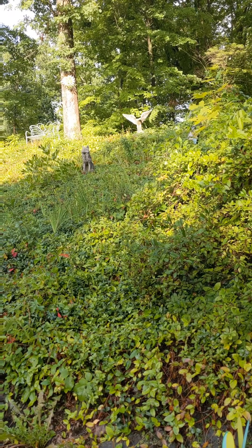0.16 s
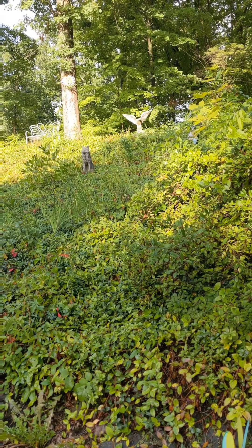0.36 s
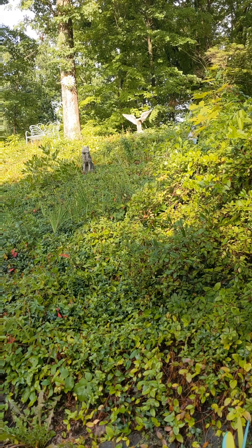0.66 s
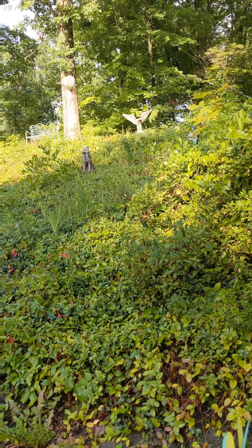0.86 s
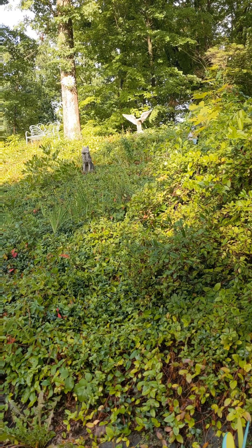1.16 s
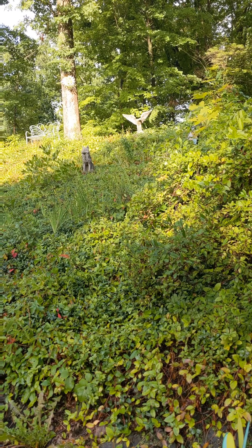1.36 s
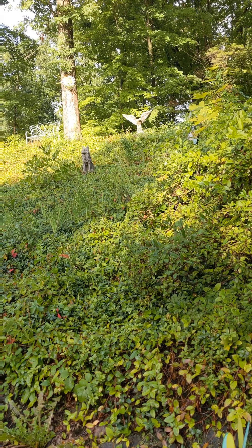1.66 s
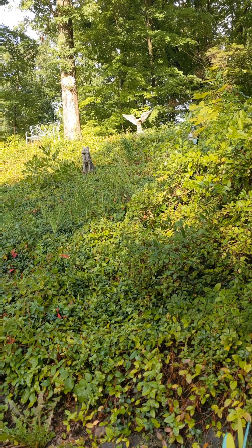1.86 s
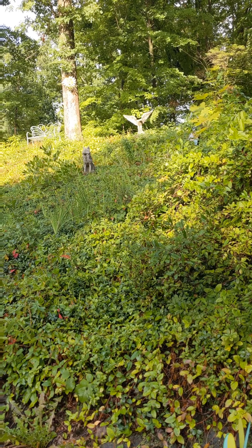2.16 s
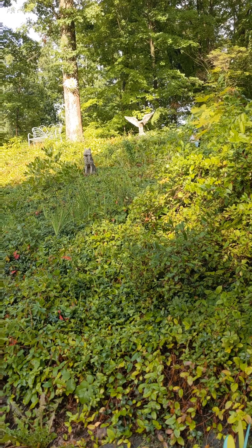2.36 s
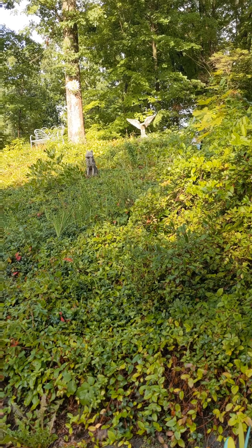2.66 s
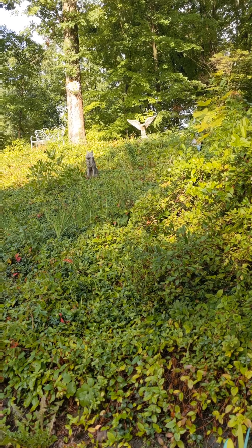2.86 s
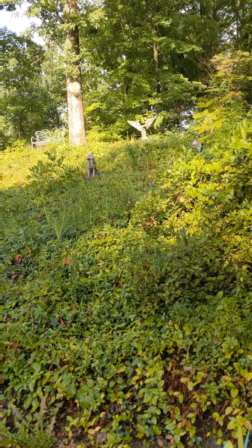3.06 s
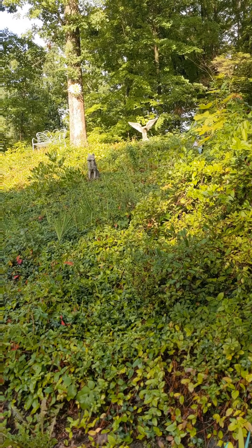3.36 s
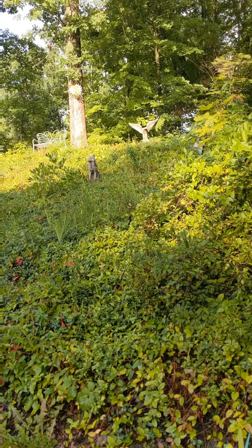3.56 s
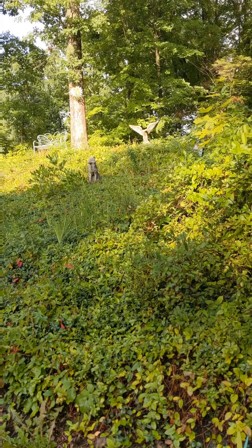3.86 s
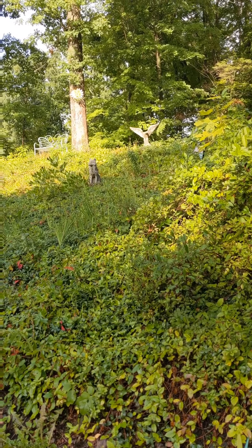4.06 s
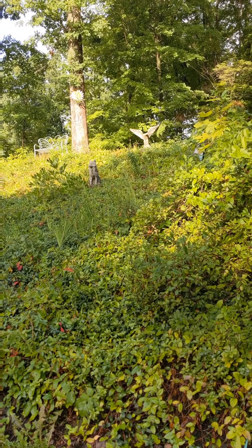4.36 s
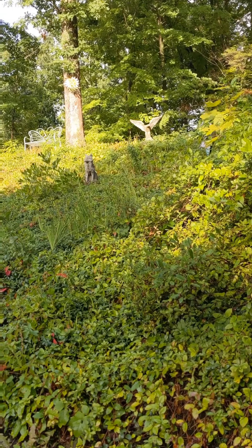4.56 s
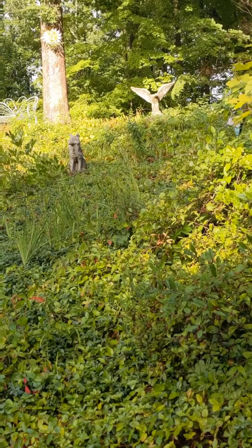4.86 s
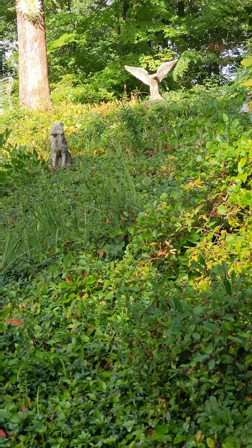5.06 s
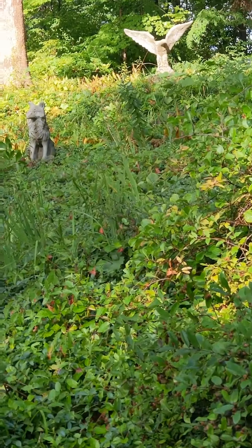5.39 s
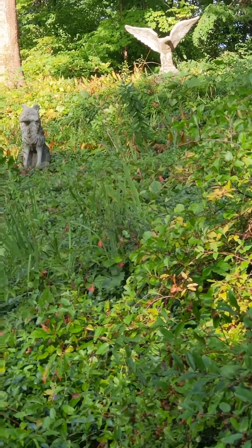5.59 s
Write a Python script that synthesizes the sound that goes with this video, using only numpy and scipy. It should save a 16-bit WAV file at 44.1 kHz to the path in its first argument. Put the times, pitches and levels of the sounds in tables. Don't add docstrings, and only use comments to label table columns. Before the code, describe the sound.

High insect song fills a quiet summer garden: pulsing tinkles and fast trills mostly on the left, over a far buzzing chorus that rises near the end.

```python
import sys
import numpy as np
from scipy import signal
from scipy.fft import rfft, irfft, next_fast_len
from scipy.io import wavfile
from scipy.ndimage import uniform_filter1d

SR = 44100
rng = np.random.default_rng(int(sys.argv[2]) if len(sys.argv) > 2 else 0)


def magnitude_from_level(level_db):
    exponent = np.asarray(level_db, float) / 20
    return 10 ** exponent


def dump(signal):
    limited = np.clip(np.atleast_2d(signal).T, -1, 1)
    pcm = np.round(limited * 32767).astype(np.int16)
    wavfile.write(sys.argv[1], SR, pcm)


N = 252693
TIME_S = np.arange(N) / SR
PADDED = next_fast_len(N)
BIN_HZ = np.arange(PADDED // 2 + 1) * SR / PADDED
SIDES = np.array([[1], [-1]])


def at_hz(points, hz):
    table_hz, values = np.transpose(points)
    return np.interp(np.log(hz), np.log(table_hz), values)


def drift(per_s):
    total = 0
    for rate in (per_s, per_s / np.e):
        count = int(N / SR * rate) + 2
        total = total + np.interp(TIME_S * rate, np.arange(count), rng.standard_normal(count))
    return total / np.sqrt(4 / 3)


def zoom(rest, start_s, settle_s, full):
    since_s = np.maximum(TIME_S - start_s, 0)
    return np.clip(rest + (full - rest) * (1 - np.exp(-since_s / settle_s)), 0, 1)


# pitch in Hz, likeness from -1 to 1 (no unit).
SIDE_LIKENESS = [(60, 1), (130, 0.98), (290, 0.95), (640, 0.9), (1410, -0.14), (3100, 0.045),
                 (6820, -0.035), (15000, -0.068)]


def coloured(white, spectrum, level_db, lean):
    hz = np.maximum(BIN_HZ, 1)
    inside = (hz > spectrum[0][0]) & (hz < spectrum[-1][0])
    gain = magnitude_from_level(at_hz(spectrum, hz)) * inside
    gain = gain / np.sqrt(np.mean(gain ** 2))
    alike = np.clip(at_hz(SIDE_LIKENESS, hz), -1, 1)
    mid, side = rfft(white, PADDED)
    pair = np.sqrt(1 + alike) * mid + SIDES * np.sqrt(1 - alike) * side
    pair = pair * magnitude_from_level(SIDES * at_hz(lean, hz) / 2)
    return magnitude_from_level(level_db) * irfft(pair * gain, PADDED)[:, :N]


# pitch in Hz, left minus right in dB.
LEAN_UNFOCUSED = [(60, 3), (130, -1), (290, -1), (640, 0), (1410, 0.0), (3100, 0.5), (6820, 3.5),
                  (15000, 18)]
LEAN_FOCUSED = [(60, 1.0), (180, -0.5), (550, 0.0), (1650, -0.65), (4970, 1), (15000, -2.3)]


def focused(white, focus, wide, wide_db, ahead, ahead_db):
    around = coloured(white, wide, wide_db, LEAN_UNFOCUSED)
    in_front = coloured(white, ahead, ahead_db, LEAN_FOCUSED)
    return (1 - focus) * around + focus * in_front


# pitch in Hz, level in dB.
HISS_SPECTRUM = [(7500, -35), (8600, -4.5), (9100, -4.5), (10800, 0.5), (12000, -1.5), (13400, -0.5),
                 (13750, 0.5), (14100, 0), (14600, 2.5), (14900, -3.5), (15400, -1), (15750, -4)]


def top_hiss():
    white = rng.standard_normal((2, N)) * magnitude_from_level(0.29 * drift(18))
    return coloured(white, HISS_SPECTRUM, -61, LEAN_FOCUSED)


# pitch in Hz, level in dB.
AIR_UNFOCUSED = [(15, -41), (25, -30), (52, -3), (70, 2), (112, -5.5), (152, -3.5), (343, -15.5),
                 (374, -17.5), (693, -19), (1170, -23.5), (1990, -20.5), (2890, -15.5), (3160, -17.5),
                 (3530, -15), (4800, -18.5), (6240, -23), (10600, -120)]
AIR_FOCUSED = [(15, -63), (25, -5), (70, -24), (149, -0.5), (427, -11.5), (607, -10.5), (678, -7),
               (902, -17.5), (2170, -23), (2370, -18.5), (2710, -19.5), (3530, -12.5), (4800, -13.5),
               (6240, -33), (10600, -120)]
# at rest (0-1), start in seconds, settling in seconds, full (0-1).
AIR_ZOOM = (0.16, 4.54, 1.4, 1.16)


def road_and_air():
    white = rng.standard_normal((2, N)) * magnitude_from_level(0.19 * drift(3.14))
    return focused(white, zoom(*AIR_ZOOM), AIR_UNFOCUSED, -53.5, AIR_FOCUSED, -49)


def far_strokes(white, per_s, stroke_s, wash):
    spectrum, out = rfft(white, PADDED), white
    edges_hz = np.arange(4500, 8501, 500)
    half_stroke = int(stroke_s * SR / 2)
    for low, high in zip(edges_hz, edges_hz[1:]):
        born = (rng.random(N) < per_s / SR) * rng.exponential(1, N)
        strokes = uniform_filter1d(uniform_filter1d(born, half_stroke), half_stroke)
        power = wash + (1 - wash) * np.maximum(strokes, 0) / np.mean(strokes)
        band = irfft(spectrum * ((BIN_HZ >= low) & (BIN_HZ < high)), PADDED)[:, :N]
        out = out + (np.sqrt(power) - 1) * band
    return out


# time in seconds, change in dB.
CHORUS_SWELL = [(0, 1.5), (1, 1.2), (1.6, 2), (3.2, 2.5), (4.2, 2)]
# pitch in Hz, level in dB.
CHORUS_UNFOCUSED = [(2710, -27), (4600, -11), (4950, -11.5), (5380, -1.5), (5590, -4.5), (5990, -3.5),
                    (6350, -1), (6560, -0.5), (6750, 2), (7180, 0), (7640, -6.5), (7890, -10.5),
                    (8800, -24), (11400, -33), (19400, -120)]
CHORUS_FOCUSED = [(2710, -40), (4600, -17), (4920, -16.5), (5230, -11.5), (5650, -8), (6340, -5), (6690, 0),
                  (7120, 2), (7640, -15), (7770, -13.5), (8340, -22), (8590, -41), (8800, -56),
                  (11400, -65), (19400, -120)]


def far_chorus(focus):
    swell_db = np.interp(TIME_S, *np.transpose(CHORUS_SWELL))
    white = rng.standard_normal((2, N))
    buzz = far_strokes(white, per_s=90, stroke_s=0.0089, wash=0.73) * magnitude_from_level(0.27 * drift(11))
    return magnitude_from_level(swell_db) * focused(buzz, focus, CHORUS_UNFOCUSED, -50, CHORUS_FOCUSED, -39)


# pitch in Hz, width in Hz, left in dB, right in dB.
RASP_RESONANCES = [(2964, 380, -0.5, -5), (3600, 117, -0.5, -7.5), (4074, 510, -16.5, -0.5)]


def throbber():
    beats_per_s, beats_behind, loudest_s, sway_s = 11.49, .28, 2.13, 1.3
    growth_db = 12 * np.minimum(TIME_S / loudest_s - 1, 0)
    sway_db = -0.5 * np.cos(2 * np.pi * (TIME_S - loudest_s) / sway_s)
    beat = np.cos(np.pi * (beats_per_s * TIME_S - beats_behind)) ** 4
    out = np.zeros((2, N))
    for hz, width_hz, left_db, right_db in RASP_RESONANCES:
        edges_hz = [hz - width_hz / 2, hz + width_hz / 2]
        band = signal.butter(2, edges_hz, "band", fs=SR, output="sos")
        rasp = signal.sosfilt(band, rng.standard_normal((2, N)))
        out += magnitude_from_level(np.array([[left_db], [right_db]])) * rasp / np.std(rasp)
    return magnitude_from_level(-58.5 + growth_db + sway_db) * beat * out


def singer(song, voice, levels, focus):
    start, end, per_s, slowing, behind = song
    pitch_hz, climb_hz, stroke_s, glide_hz, uneven_db = voice
    left_db, right_db, overtone_db, tiring_db, overtone_lean_db = levels
    count = per_s * TIME_S - slowing * TIME_S ** 2 / 2 - behind + 3
    stroke = np.round(count).astype(int)
    chance = rng.standard_normal((stroke.max() + 1, 6))[stroke].T
    from_middle_s = (count - stroke) / per_s
    place = np.clip(from_middle_s / stroke_s + .04 * chance[0], -.5, .5)
    along = (TIME_S - from_middle_s - start) / (end - start)
    shape = np.cos(np.pi * place) ** 2 * (along > 0) * (along < 1)
    onset_db = -23 * np.clip(1 - along / 0.11, 0, 1) * (start > 0)
    ending_db = -7 * np.clip(1 - (1 - along) / 0.017, 0, 1)
    effort_db = onset_db + ending_db - tiring_db * (TIME_S - start)
    hz = pitch_hz + climb_hz * (TIME_S - start) + 15 * chance[1] + glide_hz * place
    phase = 2 * np.pi * np.cumsum(hz) / SR
    paths = np.array([np.pi * chance[2], np.pi * chance[2] + 1.2 * chance[3]])
    strength = magnitude_from_level(effort_db + uneven_db * (chance[4] + 0.13 * SIDES * chance[5]))
    tone = magnitude_from_level([left_db + 3 * focus, right_db + 16.5 * focus]) * np.sin(phase + paths)
    overtone_level = magnitude_from_level(overtone_db - 10 * focus + SIDES * overtone_lean_db / 2)
    overtone = overtone_level * np.sin(2 * (phase + paths))
    return strength * shape * (tone + overtone)


def foliage(x, t60, level_db):
    tail_s = np.arange(int(.4 * SR)) / SR
    tail = rng.standard_normal((2, len(tail_s))) * magnitude_from_level(-60 * tail_s / t60) * (tail_s > .004)
    tail = tail / np.sqrt(np.sum(tail ** 2, axis=1, keepdims=True))
    return magnitude_from_level(level_db) * signal.fftconvolve(x, tail, axes=1)[:, :N]


# start in seconds, end in seconds,
# strokes per second at time 0, slowing in strokes per second each second, strokes behind at time 0.
SINGER_SONGS = [
    (0, 4.47, 14.963, .101, .32),
    (4.9, 6, 15.1, 0, 1.87),
    (.85, 4.75, 15.53, 0, 1.4),
    (0, .75, 15.65, 0, .9),
    (.4, 3.4, 15.045, 0, .05),
    (0, 4.5, 76.376, -.12, .09),
    (0, 6, 42.925, 0, .33),
    (0, 6, 86.01, 0, -.4),
    (0, 6, 45.75, .07, .6),
    (0, 6, 43.04, 0, .2),
]
# pitch in Hz, climb in Hz per second, stroke length in seconds, glide in Hz,
# unevenness in dB.
SINGER_VOICES = [(7382, 0, .028, 110, 1.2), (7388, 5, .028, 110, 1.2), (7372, 19, .022, 150, 1.2),
                 (7400, 0, .018, 130, 1.5), (7300, 5, .030, 100, .3), (5508, 4, .0100, -220, 1.2),
                 (6890, -3, .016, -80, 1.5), (5465, -4, .0095, -200, .5), (6400, 0, .012, -100, 3),
                 (6815, 0, .016, -80, 1.5)]
# left in dB, right in dB, octave overtone in dB, tiring in dB per second,
# overtone lean to the left in dB.
SINGER_LEVELS = [(-36.5, -48.5, -77, 0.5, 10), (-39, -49, -70, -4, 4), (-36, -46.5, -59, 1.2, 6),
                 (-40, -54, -62, 3, 3), (-72, -72, -53, 2.1, 2), (-41, -48.5, -71, 0.7, 0),
                 (-51, -45, -58, 1, -1), (-47.5, -56.5, -76, 0.3, 4), (-49, -58, -84, 6, 4),
                 (-46, -60, -73, 0.5, -2)]


def near_singers(focus):
    direct = sum(singer(*rows, focus) for rows in zip(SINGER_SONGS, SINGER_VOICES, SINGER_LEVELS))
    return direct + foliage(direct, t60=0.13, level_db=-17.5)


# at rest (0-1), start in seconds, settling in seconds, full (0-1).
SONG_ZOOM = (0.063, 4.58, 0.53, 0.8)


def scene():
    focus = zoom(*SONG_ZOOM)
    background = top_hiss() + road_and_air() + far_chorus(focus)
    return background + throbber() + near_singers(focus)


def flickering_top(x):
    high_pass = signal.ellip(10, .01, 60, 15080, "high", fs=SR, output="sos")
    top = signal.sosfiltfilt(high_pass, x)
    frame_s = np.arange(N // 1024 + 2) * 1024 / SR
    kept_chance = .5 * (1 - ((frame_s - 3.3) / 3.6) ** 2)
    dropped = rng.random(len(frame_s)) > kept_chance
    gate = np.repeat(dropped, 1024)[622:N + 622] * 1.
    return x - top * uniform_filter1d(gate, 300)


def low_pass(x):
    return signal.sosfilt(signal.butter(12, 15670, fs=SR, output="sos"), x)


def record(dry):
    rumble_cut = signal.butter(3, 36, "high", fs=SR, output="sos")
    mix = flickering_top(signal.sosfilt(rumble_cut, dry))
    return low_pass(mix)


dry = scene()
out = record(dry)
dump(out)
```